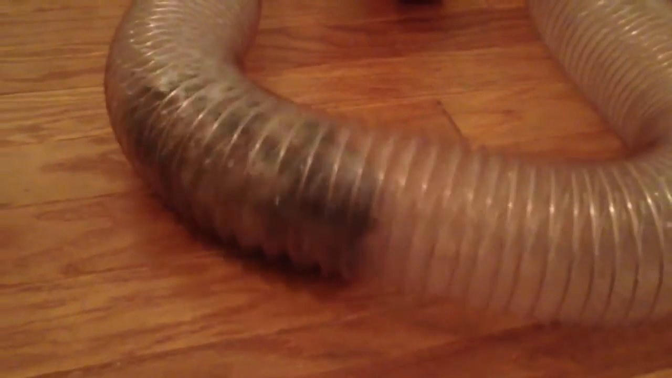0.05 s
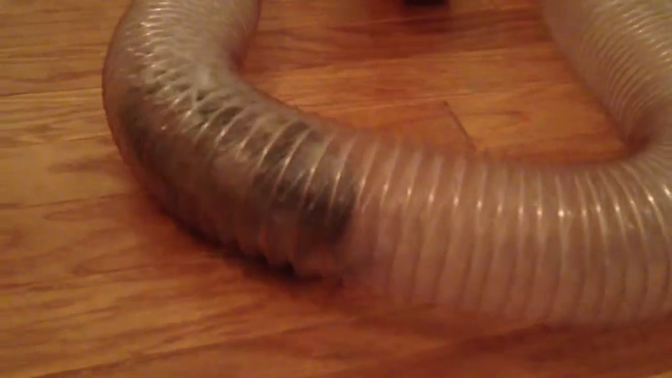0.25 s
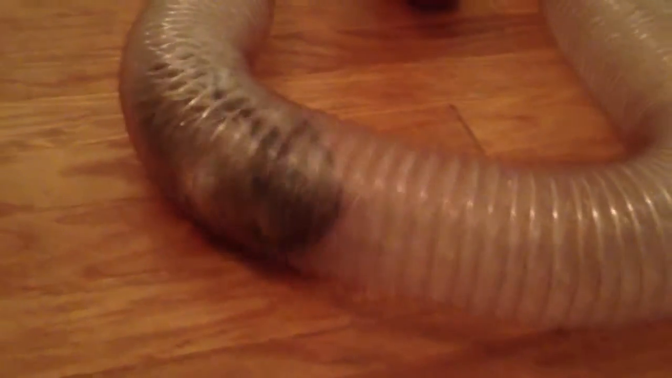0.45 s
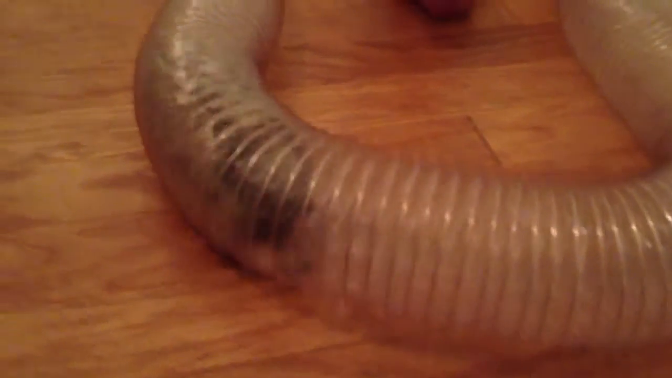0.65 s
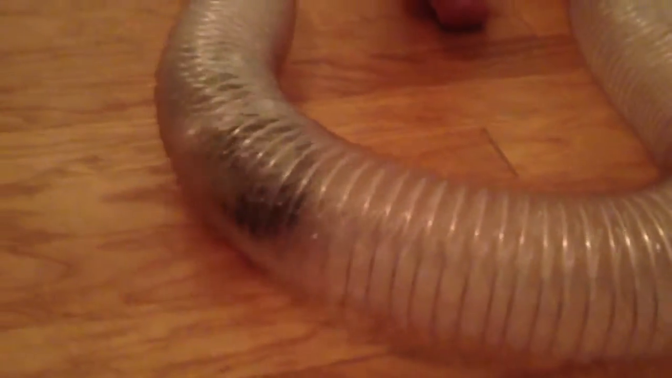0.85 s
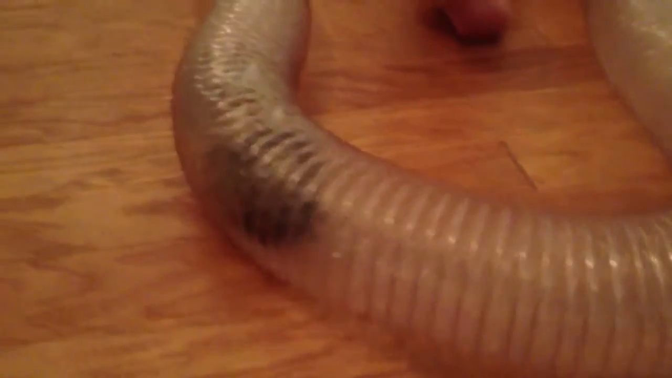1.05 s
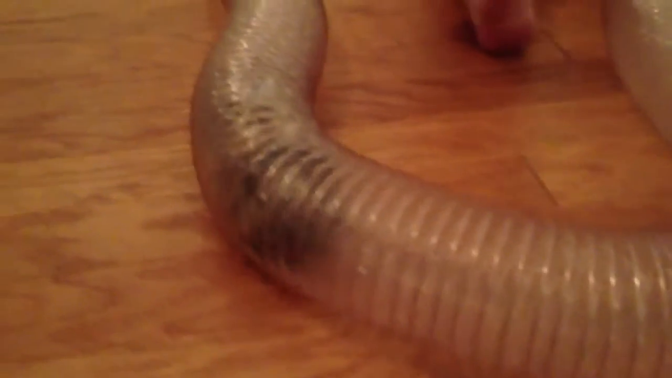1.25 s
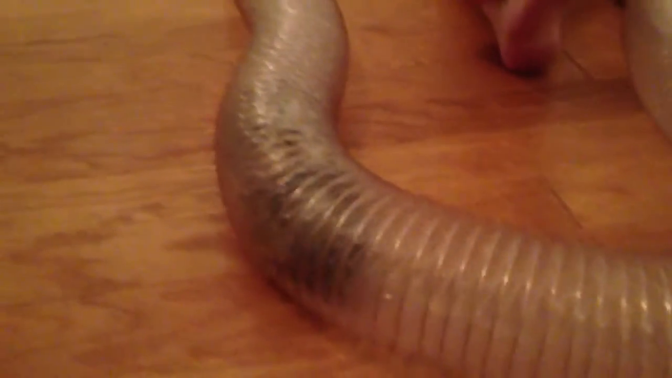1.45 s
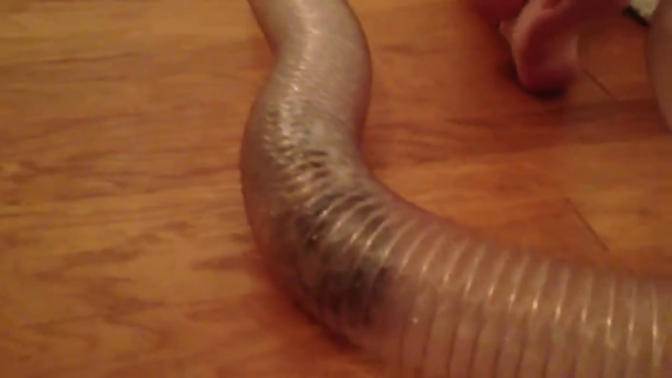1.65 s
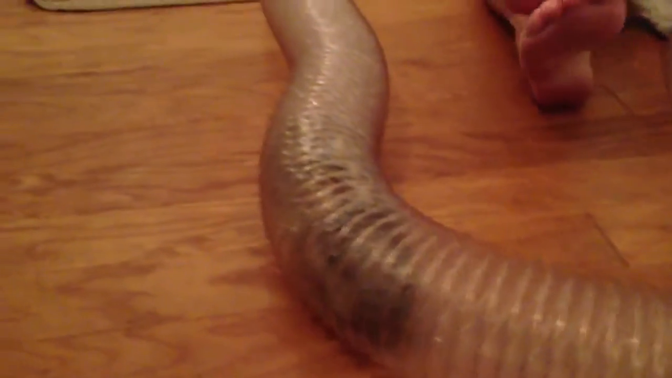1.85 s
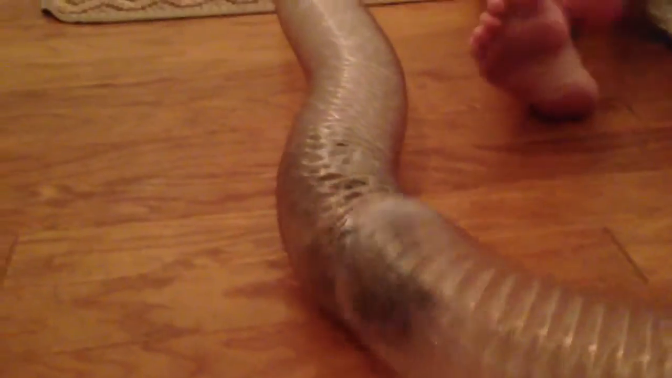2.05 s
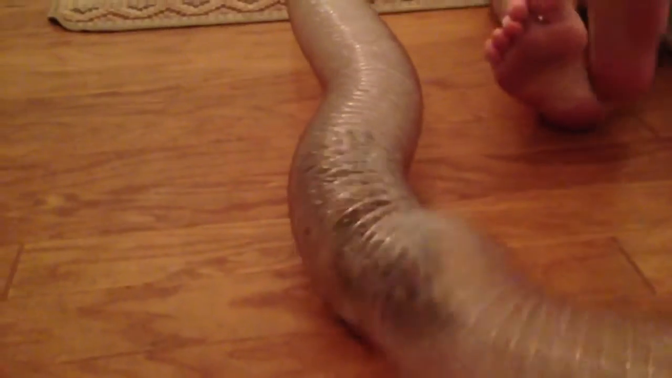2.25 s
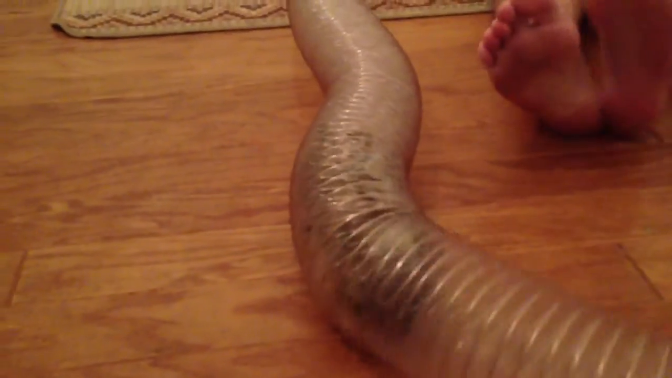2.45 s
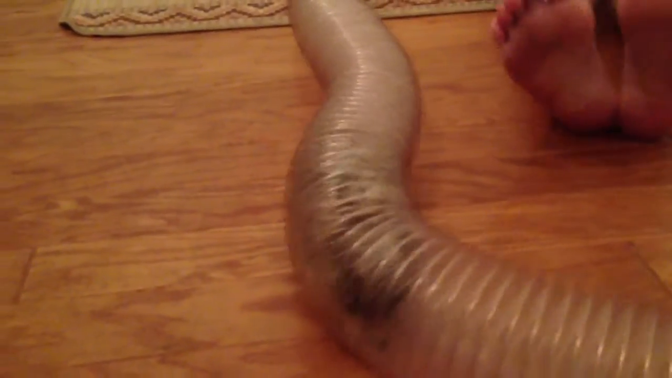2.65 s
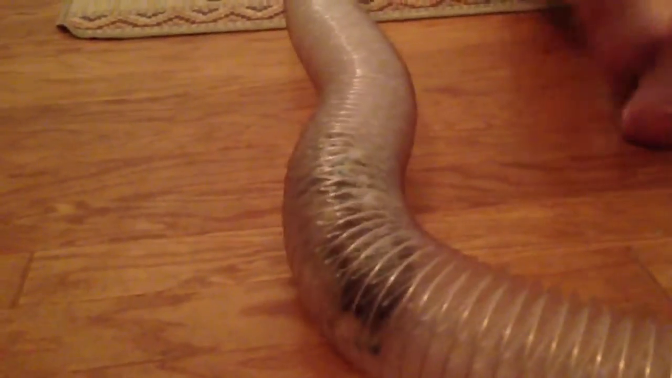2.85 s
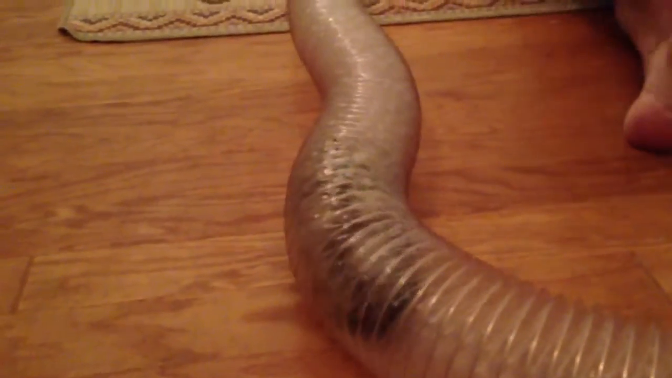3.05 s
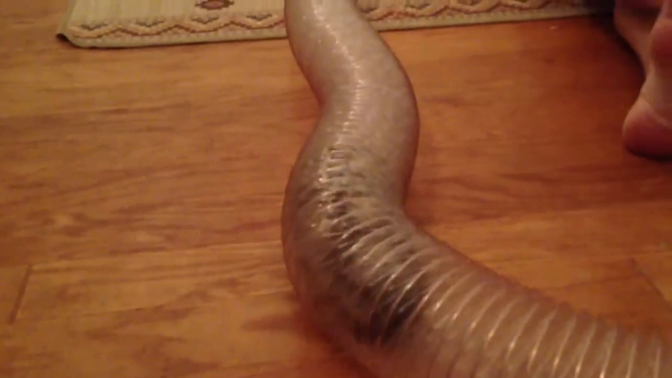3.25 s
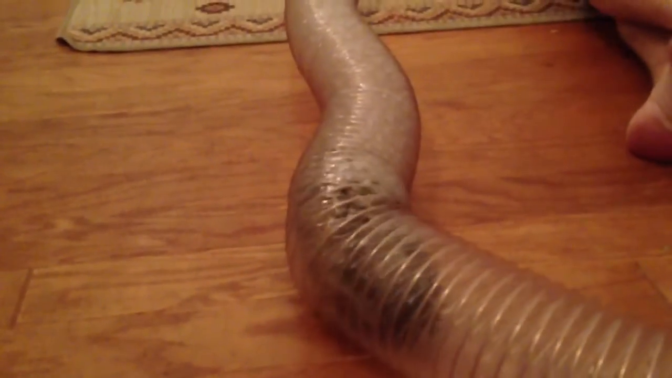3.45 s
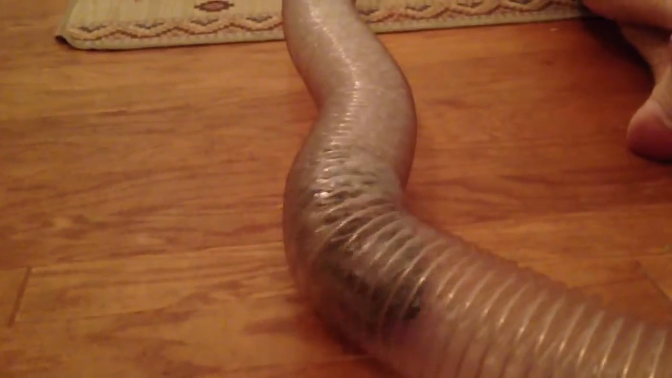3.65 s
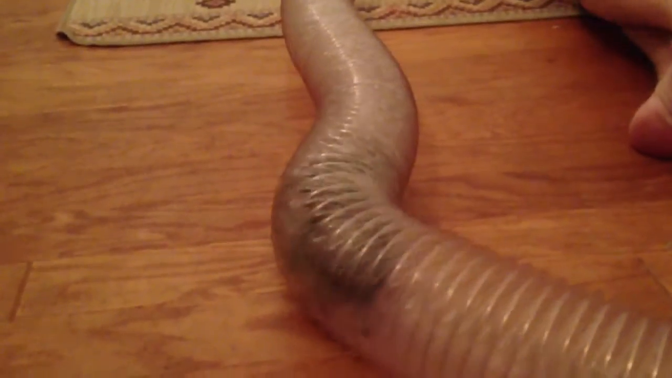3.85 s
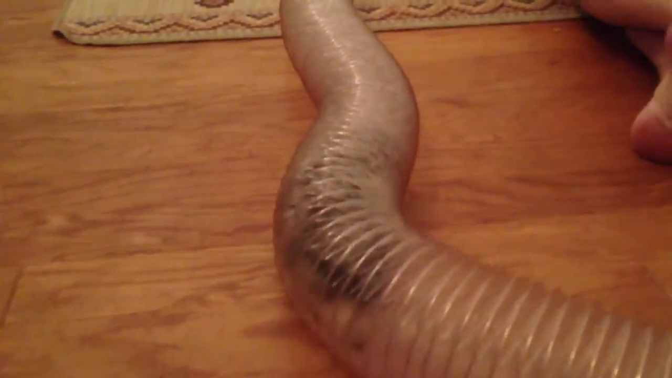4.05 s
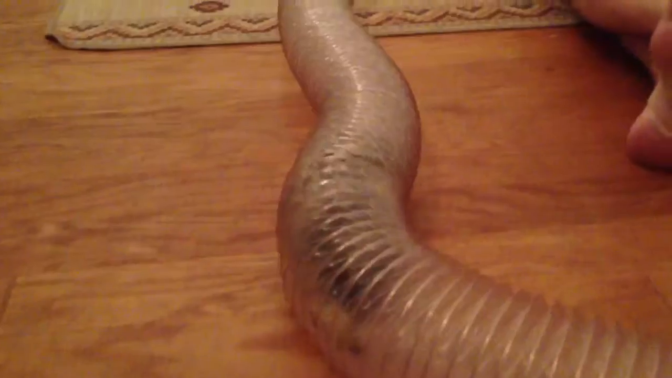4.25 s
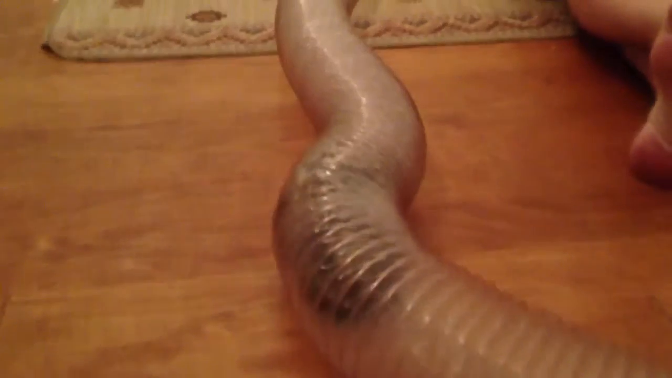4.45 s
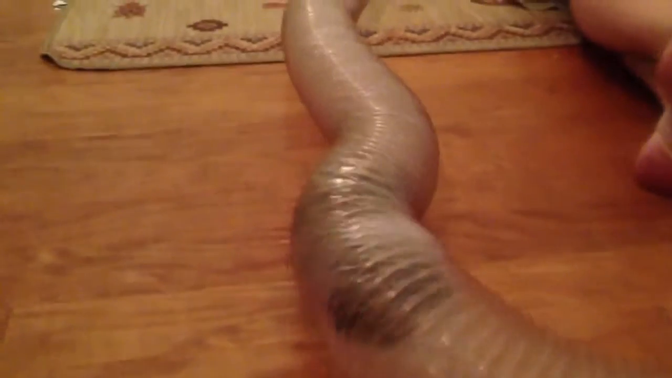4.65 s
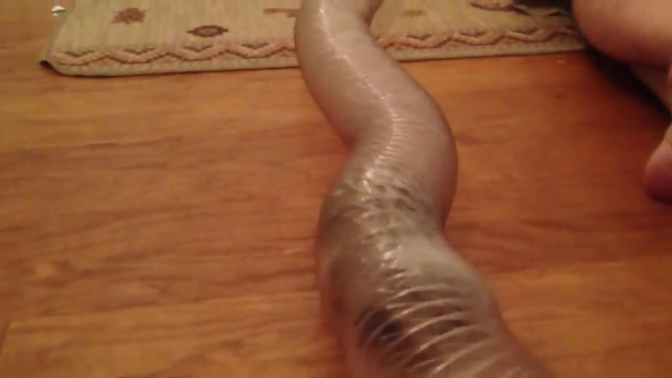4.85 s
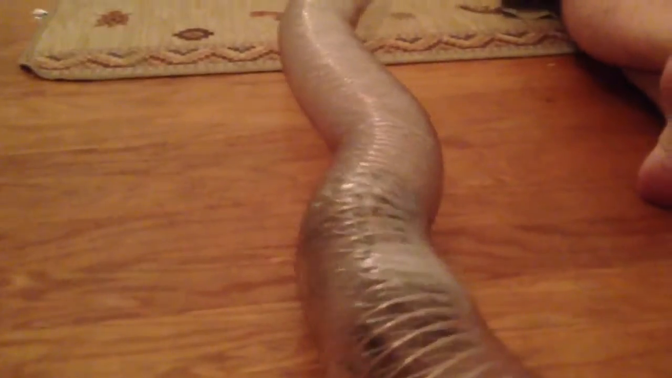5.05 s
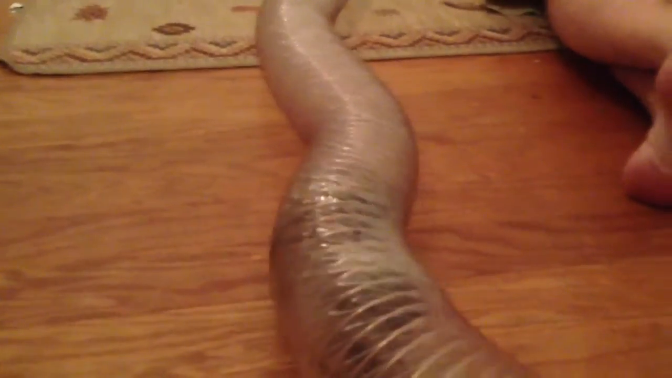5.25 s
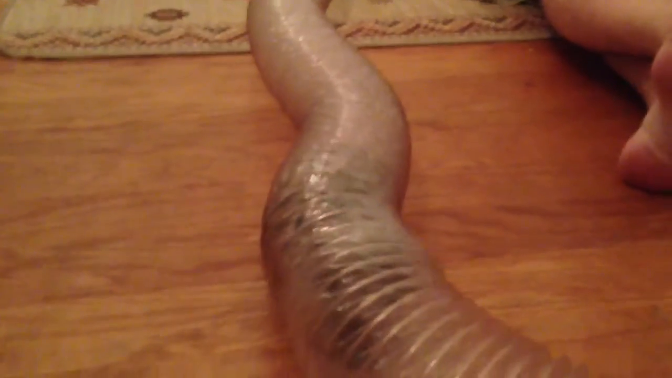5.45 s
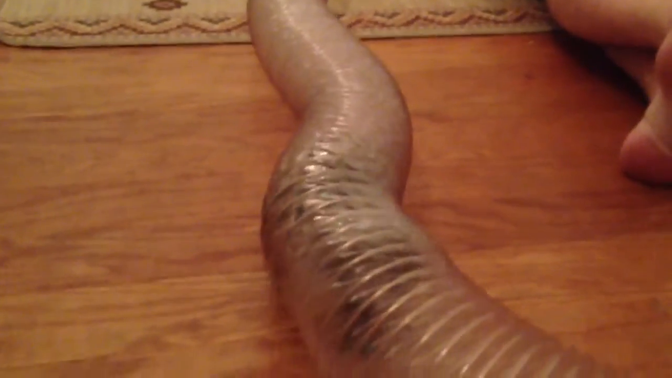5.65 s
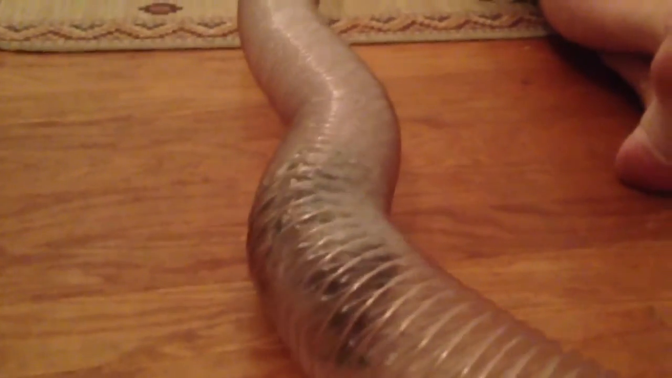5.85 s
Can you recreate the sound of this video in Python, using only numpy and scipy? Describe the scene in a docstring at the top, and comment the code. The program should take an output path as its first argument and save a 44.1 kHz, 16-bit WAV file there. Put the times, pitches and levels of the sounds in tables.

```python
"""A small pet scrabbling through a ribbed plastic hose on a wooden living-room floor, heard close by.
Claws click on the thin wall and the ribs snap as it flexes; between the clicks the body presses on the
wall, paws scratch and fur brushes along. The hose knocks on the boards and a claw squeaks along it twice.
The room rings briefly after each sound, over quiet air and the hiss of a small microphone with little bass."""
import sys
import numpy as np
from scipy import signal
from scipy.fft import rfft, irfft, next_fast_len
from scipy.io import wavfile
from scipy.ndimage import uniform_filter1d

SR = 44100
rng = np.random.default_rng(int(sys.argv[2]) if len(sys.argv) > 2 else 0)


def put_to_file(sound):
    """Save the sound as 16-bit audio at rate SR, in the file named by the first command-line argument."""
    columns = np.atleast_2d(sound).T  # one column per channel
    safe = np.clip(columns, -1, 1)
    whole_steps = np.round(safe * 32767)
    wavfile.write(sys.argv[1], SR, whole_steps.astype(np.int16))


N = 260609

# the animal's short pushes: t/s, length/s, paw level/dB, weight on the wall against the paw level/dB
PUSHES = [(0, 0.11, -55.5, -11.5), (0.218, 0.13, -55, -6.5), (0.512, .13, -52.5, -9.5),
          (.7, 0.11, -52.5, -5.5), (1.178, 0.11, -54.5, -4), (1.8, 0.025, -59.5, -3),
          (1.941, .03, -59, -16), (2.068, 0.19, -57, -3), (2.383, .26, -52, -6),
          (2.848, 0.21, -59.5, -11.5), (3.264, 0.12, -56.5, -5.5), (3.495, 0.079, -48.5, -15),
          (3.793, 0.1, -52.5, -11), (4.108, 0.22, -56, -5), (4.337, 0.043, -51.5, 1),
          (4.51, 0.1, -48, -5.5), (4.721, 0.047, -55.5, 0.5), (4.995, 0.034, -56, -13),
          (5.455, 0.13, -59, -5.5)]


def claw_clicks(ring_db=4.5, ring_octaves=0.36, size=2048):
    """Each claw click or rib snap bends the wall at one spot, which sets its colour and short ring."""
    # t/s, level/dB, edge (3.5 kHz) lift/dB, snap (7.5 kHz and up) lift/dB, wall ring f/Hz, room send/dB
    clicks = [(.0528, -50.5, 12, 0, 4500, -0.5), (0.0774, -46.5, 21, 15, 9500, -3.5),
              (.1447, -53, 4, -7, 1800, -1.5), (.3042, -50, -2, -17, 2170, -4.5),
              (.3372, -51, 6, -3, 3060, 0), (.367, -48, 5.5, 5.5, 3120, -6.5),
              (.402, -50.5, 6, -4, 1920, -3), (0.5368, -53.5, 3, -11, 3670, 5.5),
              (.5934, -45.5, 19, 17, 8200, -3), (0.6202, -47.5, 15, 16, 7350, 1),
              (0.7978, -43.5, 9, -8, 1890, -6), (0.8433, -46.5, 3, 4.5, 1790, 1.5),
              (0.8822, -40.5, 9, -10, 4070, -3.5), (1.107, -56, 4, -3, 1570, 3),
              (1.1339, -48.5, -3, -9.5, 940, -5.5), (1.2177, -38.5, 12.5, 1, 3900, -4),
              (1.2603, -36, 6.5, -1, 895, -5), (1.3088, -45.5, -25, -20, 920, -4.5),
              (1.4574, -58, -5, -24, 1540, 2.5), (2.238, -34, -0.5, -6, 880, 3.5),
              (2.2442, -31.5, 5, 5.5, 930, -4), (2.257, -34, 0, -9, 1020, 0), (2.42, -45, 10, -4, 3530, -4),
              (2.4678, -36.5, 2.5, 2, 4220, -2.5), (2.521, -50, 8, -12, 2540, 1),
              (2.5535, -35.5, -5, -14, 920, -3.5), (2.574, -30, -7, -6, 2620, -4.5),
              (2.6379, -45.5, -8, -2.5, 2370, -1.5), (3.009, -40, 7, -15, 4800, 0),
              (3.0244, -45.5, 8, 3, 3140, 0), (3.2507, -47, 3.5, 0, 4220, 1),
              (3.2753, -42, 13, 0, 4340, -1), (3.3846, -33.5, 11, 7, 2380, -1),
              (3.5137, -34.5, 4, 7, 3800, -1), (3.5361, -39, 7.5, -4, 4170, -1),
              (3.5548, -40, -2, -5, 1500, -4.5), (3.721, -27, 5.5, 2, 1300, -1.5),
              (3.776, -33.5, -2, -2.5, 8200, -1.5), (3.813, -37, -.5, -9, 1230, -6.5),
              (3.8304, -45, 8, -2, 4130, -1), (4.1714, -48, 11, 1, 5100, -8),
              (4.219, -49.5, 5.5, -3, 4570, 7), (4.2277, -42, 15.5, -3, 5130, -17),
              (4.3343, -50.5, 18, 2, 3920, -9), (4.3482, -47, 5, 2.5, 3420, 3),
              (4.3609, -36, -38, -23, 1040, -3.5), (4.3958, -43.5, 5, -1.5, 1480, 0),
              (4.4724, -34, 2.5, -2, 7100, -4), (4.559, -32, 7.5, -11.5, 1120, -4.5),
              (4.5722, -29, 6, -27, 2520, -3), (4.589, -35.5, 13, -11.5, 2240, -6),
              (4.6811, -37, 8.5, -21, 2450, -3), (4.7215, -35.5, 2.5, -4.5, 3960, -3.5),
              (5.057, -50.5, 5, -2, 2500, 0.5), (5.1202, -50.5, 8, 1.5, 1640, 0),
              (5.3545, -58.5, 17, 24, 7190, -5), (5.4729, -48, 4, -11, 3240, -2.5),
              (5.5452, -50, -1, -3.5, 2330, -1), (5.6256, -47, 3, -22, 2150, -5.5),
              (5.7087, -53, 5.5, -1.5, 3800, -2)]
    direct, lingering = np.zeros(N), np.zeros(N)
    hz = np.fft.rfftfreq(size, 1 / SR)
    for s, db, edge_db, snap_db, ring_hz, room_db in clicks + claw_ticks():
        shape = [(40, -40.5), (130, -10.5), (380, -8), (850, 0), (1500, 0),  # f/Hz, level/dB
                 (3500, edge_db - 6.5), (7500, snap_db - 6), (15500, snap_db - 13)]
        ring = ring_db * np.exp(-(np.log2((hz + 1) / ring_hz) / ring_octaves) ** 2)
        limit_hz = 11240 + 550 * max(db + 34, 0)  # a harder click has a shorter contact, so more treble
        rolloff = -10 * np.log10(1 + (hz / limit_hz) ** 12)
        pulse = sharpest_pulse(curve_at(shape, hz) + ring + rolloff)
        strength = amp(db) * np.sqrt(0.007 * SR)  # the energy of 7 ms at this level
        add(direct, s, strength * unit_energy(signal.fftconvolve(pulse, near_paths())))
        add(lingering, s, strength * amp(room_db) * unit_energy(signal.fftconvolve(pulse, room_tail())))
    return direct + hose_ring(lingering)


def claw_ticks(count=60):
    """Rows of extra light clicks at random moments, as strong as the paws are working just then."""
    when = rng.integers(0, N, count)
    force, bright, spot = rng.standard_normal((count, 3)).T
    db = 20 * np.log10(paw_effort()[when]) - 1 + 4 * np.clip(force, -2, 1)
    edge_db, snap_db = 5.5 + 3 * bright, -1.5 + 5 * bright
    ring_hz = 2820 * 2 ** (0.44 * spot)
    room_db = np.full(count, -4)
    return list(zip(when / SR, db, edge_db, snap_db, ring_hz, room_db))


def near_paths(rattle_db=-1, rattle_s=0.0013, bounce_db=-4, size=600):
    """The direct pulse, a brief rattle of the neighbouring ribs, and the bounce off the floor."""
    t = np.arange(size) / SR
    rattle = rng.standard_normal(size) * np.exp(-t / rattle_s) * (t > t[2])
    paths = amp(rattle_db) * unit_energy(rattle)
    paths[0] += 1
    bounce_s = 0.0026 * rng.uniform(0.7, 1.15)
    add(paths, bounce_s, amp(bounce_db) * paths[:size // 2])
    return wall_dispersion(paths)


def wall_dispersion(x, lag=0.51, stages=5):
    """Bending waves in the thin wall carry the treble ahead of the bass."""
    for _ in range(stages):
        x = signal.lfilter([-lag, 1], [1, -lag], x)
    return x


def floor_knocks(blow_s=0.0019, rise_s=0.0044):
    """The hose hits the floor: a dull blow of a few cycles, then the ring of hose and boards."""
    # knocks on the floor: t/s, level/dB, blow f/Hz, send to the ringing boards/dB
    knocks = [(1.242, -48.5, 1010, -28), (1.261, -36, 1000, -22), (1.309, -43, 930, -33),
              (1.468, -57, 350, -15), (2.145, -48, 397, -16), (2.2385, -32.5, 755, -4.5),
              (2.244, -30.5, 398, -2), (2.256, -40, 635, -2.5), (2.315, -40, 647, -9),
              (2.575, -35, 720, -25), (2.648, -45, 360, -10), (3.082, -50.5, 418, -6.5),
              (3.721, -35.5, 1316, -26), (3.776, -39.5, 350, -26), (3.8135, -46, 1200, -30),
              (4.361, -44, 473, -24), (4.586, -40, 343, -21), (4.7484, -35.5, 345, -39),
              (4.774, -43, 660, -20)]
    # modes of hose and floorboards together: f/Hz, level/dB, t60/s
    boards = [(144.5, 3.5, 0.42), (173.4, 1.5, 0.23), (251, 1.5, 0.23), (350, -7, 0.11), (447, -2, 0.5),
              (681, -5, 0.2), (733, 1.5, 0.23), (809, 12.5, 0.09), (950, -26, 0.19), (1110, -36, 0.19)]
    out, t = np.zeros(N), np.arange(SR // 2) / SR
    ring = sum(amp(db - 60 * t / t60) * np.sin(2 * np.pi * hz * t) for hz, db, t60 in boards)
    ring *= 1 - np.exp(-t / rise_s)
    for s, db, blow_hz, ring_db in knocks:
        blow = np.sin(2 * np.pi * blow_hz * t) * t / blow_s * np.exp(1 - t / blow_s)
        add(out, s, amp(db) * (amp(2) * in_room(blow, wet_db=-5) + amp(ring_db - 9.5) * ring))
    return out


def claw_squeaks(median_slips_per_s=220, width_hz=380):
    """A claw sticks and slips unevenly, ringing a patch of wall whose pitch shifts as it bends."""
    # a claw dragging over the plastic, one list a squeak: t/s, relative level/dB, wall resonance f/Hz
    squeaks = [
        [(4.575, -32.5, 2460), (4.600, -42, 2110), (4.620, -43, 2570), (4.636, -53, 1990), (4.650, -52, 2090),
         (4.668, -50, 2390), (4.697, -46, 1960), (4.720, -56, 2164)],
        [(5.626, -41, 2080), (5.645, -66, 1750), (5.668, -60, 1570), (5.685, -61, 1770)],
    ]
    out = np.zeros(N)
    pole = np.exp(-np.pi * width_hz / SR)
    for rows in squeaks:
        s, db, hz = np.transpose(rows)
        t = np.arange(s[0], s[-1], 1 / SR)
        pace = median_slips_per_s * np.exp(0.5 * wander(len(t), 200))
        slips = np.diff(np.floor(np.cumsum(pace) / SR), prepend=0) * rng.uniform(0.48, 1, len(t))
        turn = np.exp(2j * np.pi * np.cumsum(np.interp(t, s, hz)) / SR)
        ring = (turn * signal.lfilter([1 - pole], [1, -pole], slips / turn)).imag  # gliding resonator
        ring = signal.sosfilt(signal.butter(2, 1200, "high", fs=SR, output="sos"), ring)
        envelope = amp(np.interp(t, s, db) - 2) * signal.windows.tukey(len(t), 0.08)
        add(out, s[0], envelope * unit_rms(ring))
    return in_room(out, wet_db=-5)


def rubbing(wobble_db=1.63):
    """Body, paws and fur rub inside the hose; the pressure wavers as the paws grip and let go."""
    pressure = amp(wobble_db * wander(N, 900))
    return in_room(pressure * (body_weight() + paw_scratch()) + fur_brush(), wet_db=-6.5)


def body_weight():
    """The body presses on the wall with each push, making a low, grainy rub."""
    # spectrum of the loaded wall: f/Hz, level/dB
    colour = [(30, -4), (80, -20), (120, -14), (150, -12.5), (190, 2.5), (250, -5.5), (330, 4.5),
              (450, -2.5), (650, -4.5), (900, 0), (2000, -55)]
    load = strokes([(s, length, db + lean_db) for s, length, db, lean_db in PUSHES], rest_db=-74.5)
    slips = friction(per_s=110, spread_db=2, smooth=0.86, slip_s=0.00066)
    return amp(-1.5) * load * coloured(slips, colour)


def paw_scratch():
    """Paws scratch over the ribs in a crinkle of tiny slips."""
    # spectrum of paws on plastic: f/Hz, level/dB
    colour = [(200, -28), (550, -4), (800, -5.5), (1300, -0.5), (2700, 0), (4500, -3.5), (6500, -9),
              (12000, -21)]
    slips = friction(per_s=200, spread_db=4, smooth=0.9, slip_s=0.00082)
    return amp(-5) * paw_effort() * coloured(slips, colour)


def paw_effort():
    """How hard the paws work over time; they stir faintly between pushes."""
    return strokes([row[:3] for row in PUSHES], rest_db=-75.5)


def fur_brush():
    """Fur slides along the ribs with a soft, high hiss."""
    # strokes of fur: t/s, length/s, relative level/dB
    brushes = [(.03, .1, -65.5), (.21, 0.038, -57), (.55, 0.31, -62), (1.22, 0.056, -74),
               (1.93, .08, -63.5), (2.15, 0.081, -57.5), (2.48, 0.17, -58), (2.78, .14, -58),
               (3.54, 0.11, -58.5), (3.73, 0.072, -53), (4.5, 0.33, -63.5), (5.02, 0.03, -65),
               (5.53, 0.048, -67)]
    # spectrum of fur on plastic: f/Hz, level/dB
    colour = [(1500, -25), (4000, -3.5), (6500, -3), (9000, -5), (12000, -5.5), (15500, -12.5)]
    sliding = strokes(brushes, rest_db=-82, attack_s=0.013, release_s=0.1)
    return amp(-3) * sliding * coloured(rng.standard_normal(N), colour)


def friction(per_s, spread_db, smooth, slip_s):
    """Tiny slips of uneven size, each a brief burst of noise, over a share of smooth rubbing."""
    sizes = amp(spread_db * np.minimum(rng.exponential(1, N), 3.5))
    slipping = rng.random(N) < per_s / SR
    bursts = signal.lfilter([1], [1, -np.exp(-1 / (slip_s * SR))], sizes * slipping)
    return unit_rms(bursts * rng.standard_normal(N)) + smooth * rng.standard_normal(N)


def strokes(rows, rest_db, attack_s=0.023, release_s=0.11):
    """Gain over time of movements (t/s, length/s, level/dB) that build up, hold and die away."""
    power, t = np.full(N, amp(rest_db) ** 2), np.arange(SR) / SR
    for start, length, db in rows:
        envelope = np.minimum(t / attack_s, 1) * np.exp(-np.maximum(t - length, 0) / release_s)
        add(power, start, (amp(db) * envelope) ** 2)
    return np.sqrt(power)


def hose_ring(x):
    """The air column and the wall of the hose favour a few narrow bands."""
    # hose resonances: f/Hz, width/Hz, level/dB
    resonances = [(197, 61, -12), (341, 23, 2.5), (497, 26, 7), (758, 37, 4.5), (900, 90, -18),
                  (1335, 17, -4.5), (1680, 49, -11.5), (2280, 95, -5.5), (2480, 27, 0), (2760, 37, 3)]
    modes = sum(amp(db) * signal.lfilter(*signal.iirpeak(hz, hz / width, SR), x)
                for hz, width, db in resonances)
    return amp(-0.5) * (x + modes)


def in_room(x, wet_db):
    """The close sound plus the room's reverberation, coloured by the hose."""
    return x + amp(wet_db) * hose_ring(signal.oaconvolve(x, room_tail())[:len(x)])


def room_tail(rise_s=0.0028, size=20000):
    """Dense living-room reflections of energy 1 that build up quickly and die at each band's speed."""
    # spectrum of the reflections: f/Hz, level/dB
    colour = [(100, 6.5), (330, 6), (800, -1.5), (1500, 1), (2700, 1), (5000, 1), (9000, -3.5),
              (15000, -0.5)]
    # reverberation time: f/Hz, t60/s
    t60 = [(150, 0.098), (400, 0.14), (1000, 0.32), (2800, 0.31), (7000, 0.34), (15000, 0.27)]
    hz, t, noise = signal.stft(rng.standard_normal(size), SR, nperseg=256)
    fade_db = curve_at(colour, hz)[:, None] - 60 * t / curve_at(t60, hz)[:, None]
    tail = signal.istft(noise * amp(fade_db), SR, nperseg=256)[1][:size]
    onset = 1 - np.exp(-(np.arange(size) / SR / rise_s) ** 2)
    return unit_energy(tail * onset)


def room_tone(level_db=-65, swell_db=2):
    """Quiet room air, its low rumble swelling slowly, and microphone hiss."""
    # spectrum of air and hiss: f/Hz, level/dB
    colour = [(25, -21), (70, -15), (110, -6.5), (150, 2), (250, -3), (350, -3), (500, -5), (800, -7.5),
              (1300, -10.5), (2500, -10.5), (5000, -10.5), (10000, -14.5), (15500, -15.5)]
    air = amp(level_db) * coloured(rng.standard_normal(N), colour)
    rumble = signal.sosfiltfilt(signal.butter(2, 700, fs=SR, output="sos"), air)
    swell = amp(-swell_db * wander(N, 5000))
    return air + rumble * (swell - 1)


def amp(db):
    """Decibels to amplitude."""
    return 10 ** (np.asarray(db) / 20)


def unit_rms(x):
    """Scales to rms 1."""
    return x / np.sqrt(np.mean(x ** 2) + 1e-20)


def unit_energy(x):
    """Scales to energy 1."""
    return x / np.sqrt(np.sum(x ** 2) + 1e-20)


def wander(size, span):
    """Random drift of rms 1, smoothed over a span of samples."""
    return unit_rms(uniform_filter1d(rng.standard_normal(size), span))


def curve_at(points, hz):
    """Joins points by straight lines on a log-frequency axis."""
    f, value = np.transpose(points)
    return np.interp(np.log(hz + 1), np.log(f + 1), value)


def add(mix, s, sound):
    """Mixes a sound in at s seconds."""
    part = mix[round(s * SR):][:len(sound)]
    part += sound[:len(part)]


def coloured(x, points):
    """Filters by a spectrum (f/Hz, level/dB) and scales to rms 1."""
    size = next_fast_len(len(x))
    gain = amp(curve_at(points, np.fft.rfftfreq(size, 1 / SR)))
    return unit_rms(irfft(rfft(x, size) * gain, size)[:len(x)])


def sharpest_pulse(db):
    """The minimum-phase pulse that has this spectrum and starts at time zero."""
    log_gain = np.log(amp(np.concatenate([db, db[-2:0:-1]])))
    return np.fft.ifft(np.exp(np.conj(signal.hilbert(log_gain)))).real[:len(db)]


def scene():
    """The pet in its hose and the room around it, in mono."""
    return (claw_clicks() + floor_knocks() + rubbing() + claw_squeaks() + room_tone())[None]


def record(dry, low_hz=85, top_hz=15550):
    """A small microphone with little bass and a steep cut at the top of the treble."""
    thin = signal.sosfilt(signal.butter(2, low_hz, "high", fs=SR, output="sos"), dry)
    lowpass = signal.firwin(301, top_hz, window=("kaiser", 8), fs=SR)
    return signal.oaconvolve(thin, lowpass[None], "same")


dry = scene()
out = record(dry)
put_to_file(out)
```